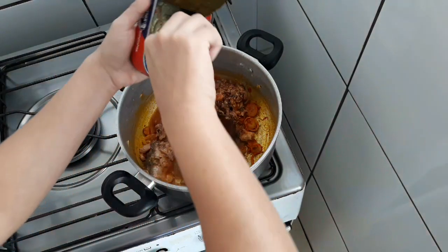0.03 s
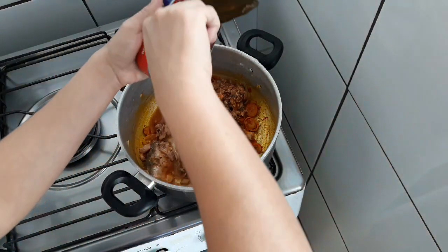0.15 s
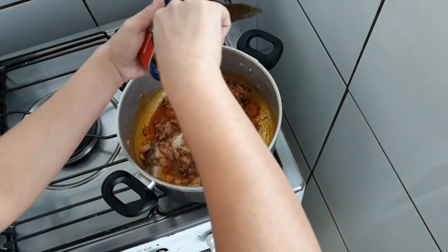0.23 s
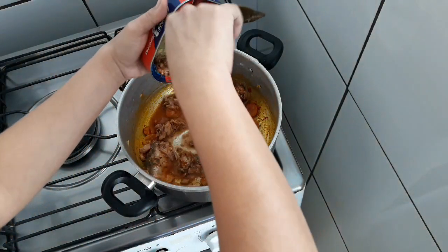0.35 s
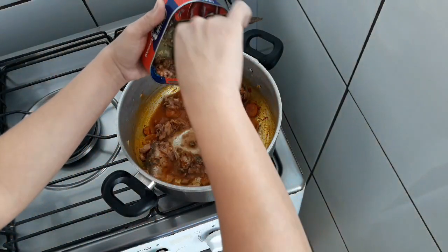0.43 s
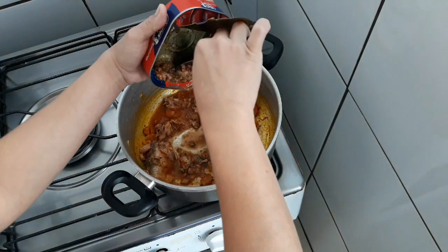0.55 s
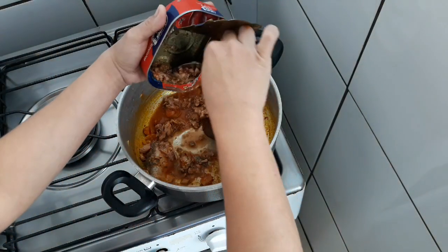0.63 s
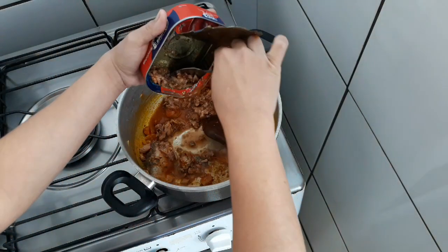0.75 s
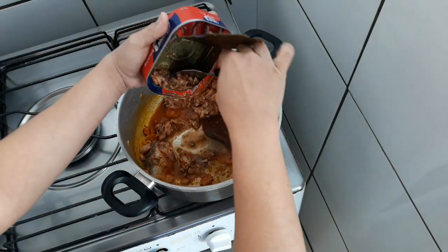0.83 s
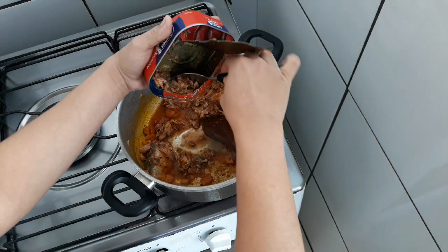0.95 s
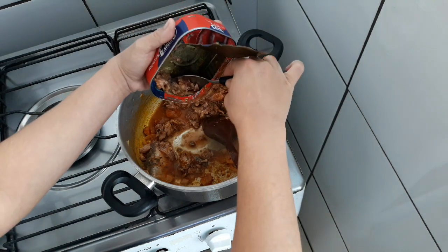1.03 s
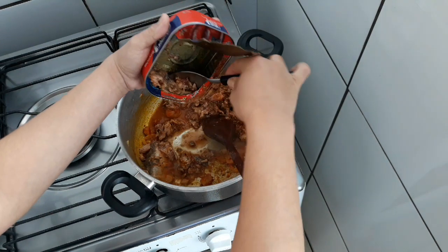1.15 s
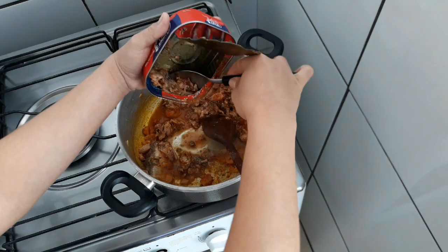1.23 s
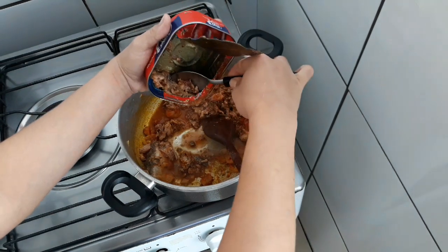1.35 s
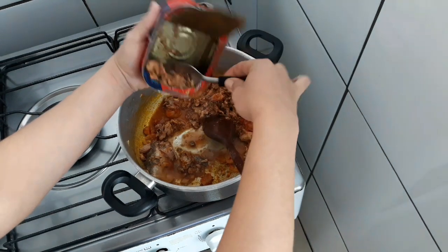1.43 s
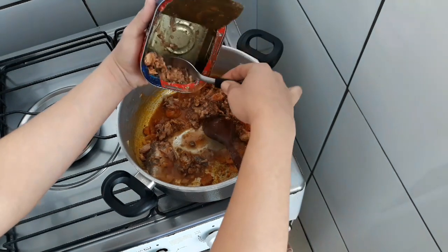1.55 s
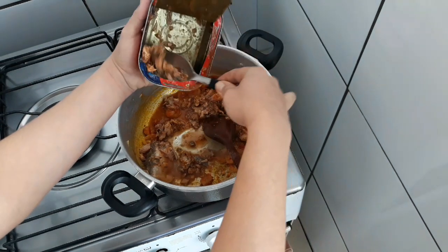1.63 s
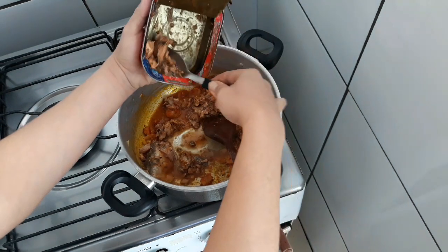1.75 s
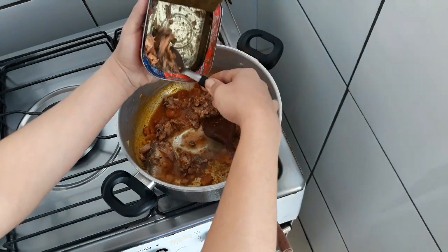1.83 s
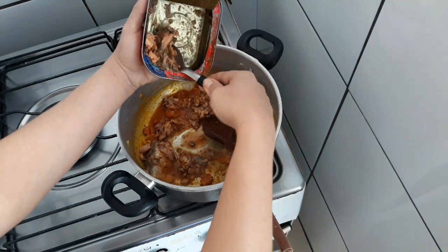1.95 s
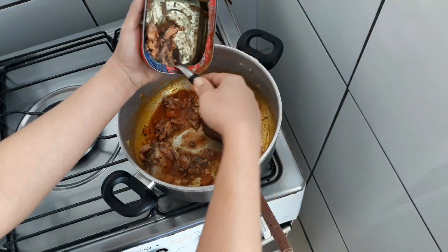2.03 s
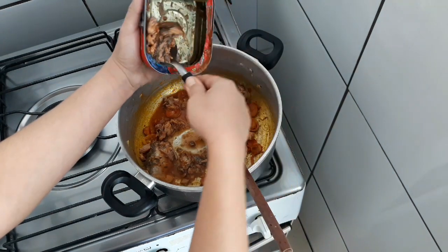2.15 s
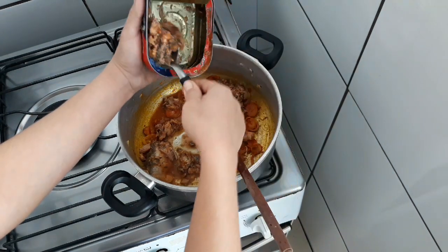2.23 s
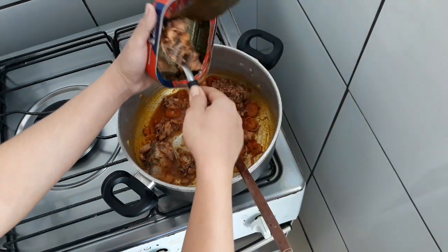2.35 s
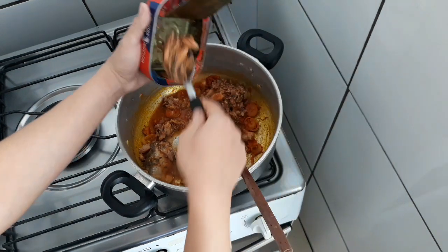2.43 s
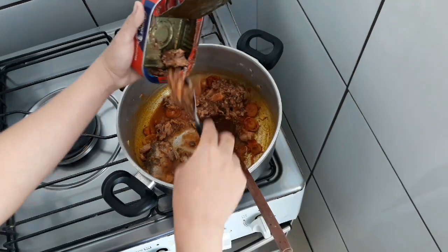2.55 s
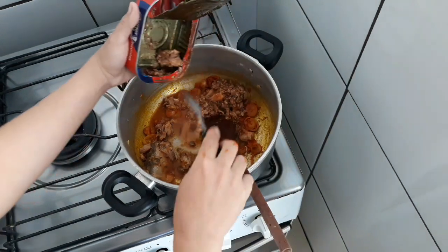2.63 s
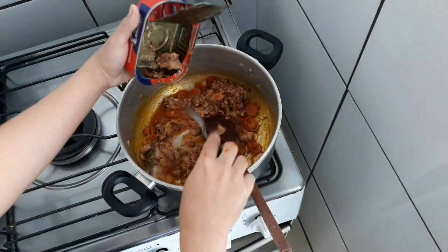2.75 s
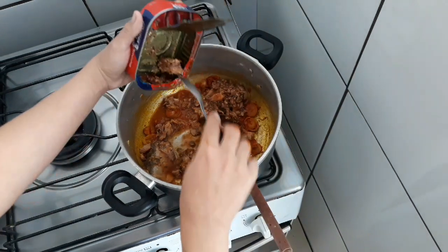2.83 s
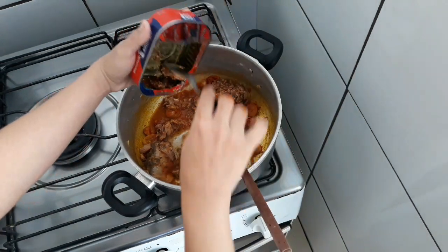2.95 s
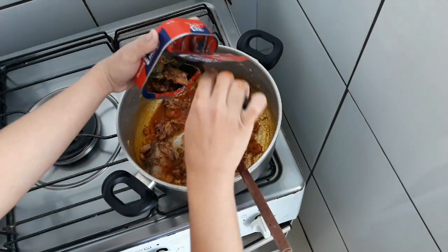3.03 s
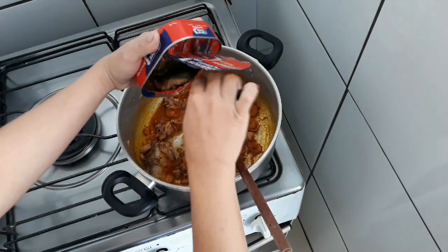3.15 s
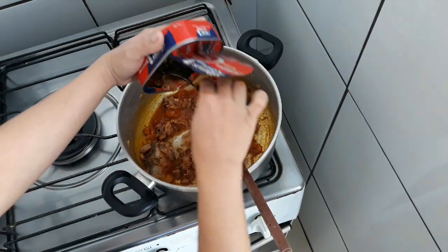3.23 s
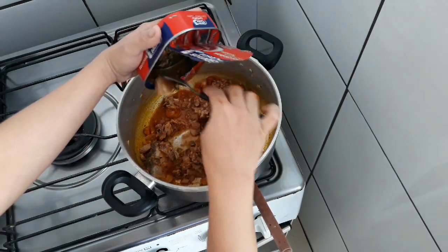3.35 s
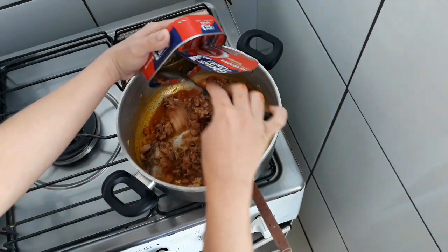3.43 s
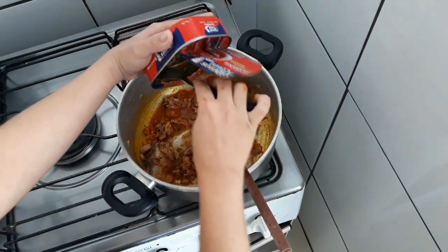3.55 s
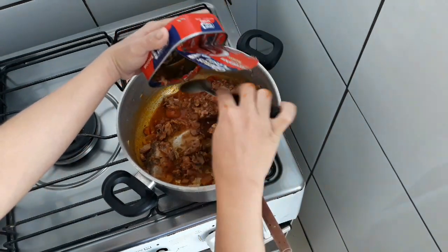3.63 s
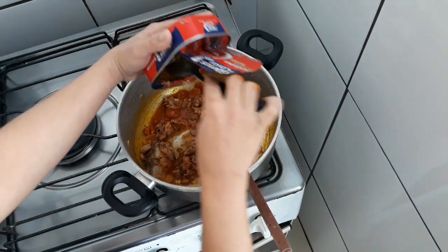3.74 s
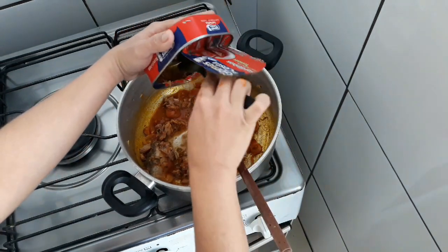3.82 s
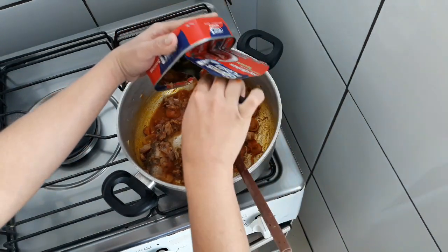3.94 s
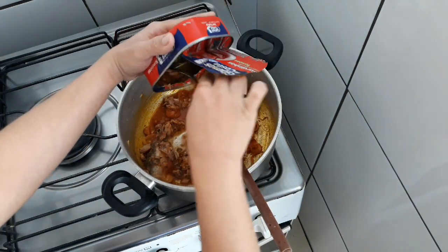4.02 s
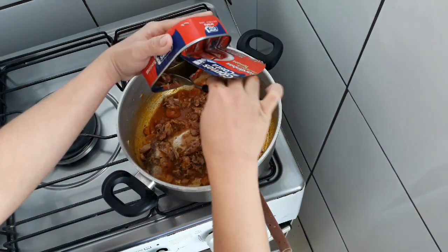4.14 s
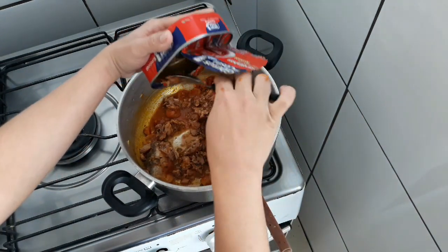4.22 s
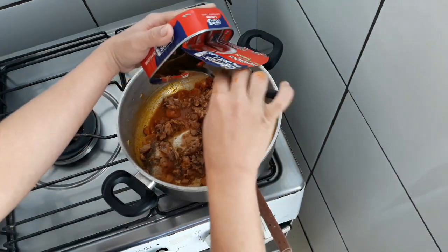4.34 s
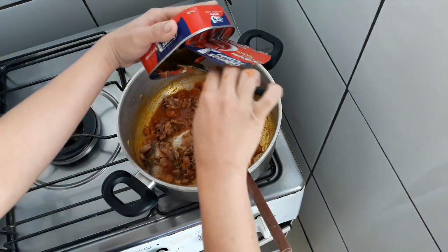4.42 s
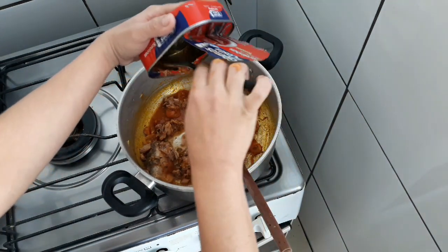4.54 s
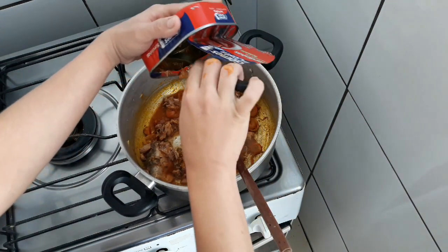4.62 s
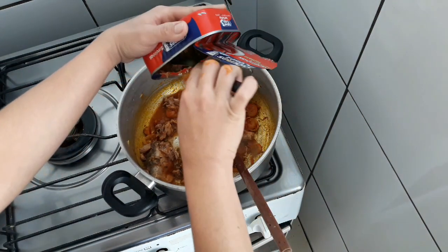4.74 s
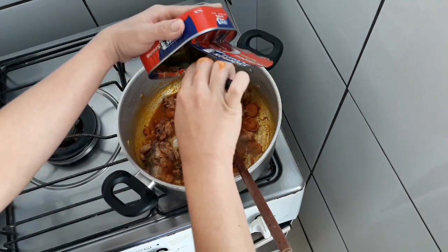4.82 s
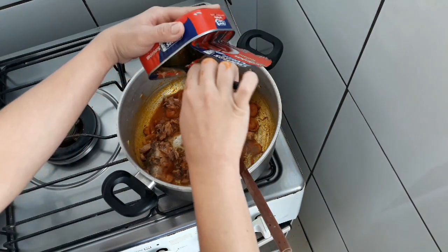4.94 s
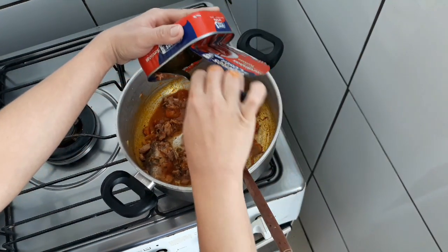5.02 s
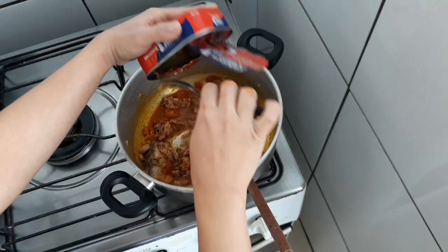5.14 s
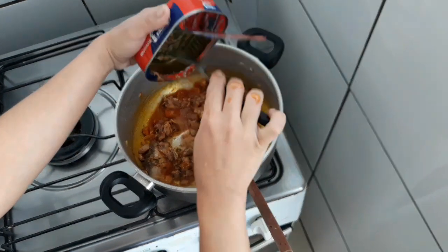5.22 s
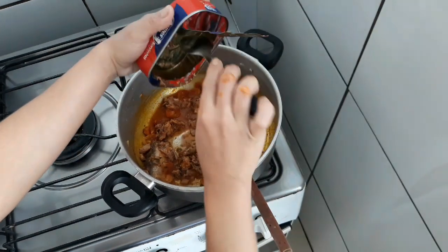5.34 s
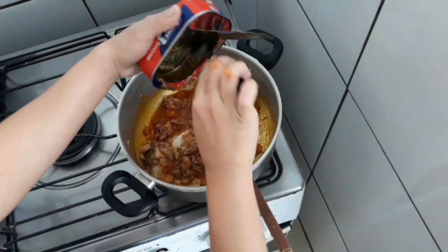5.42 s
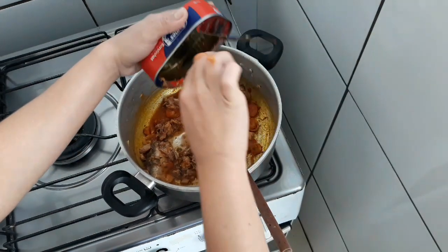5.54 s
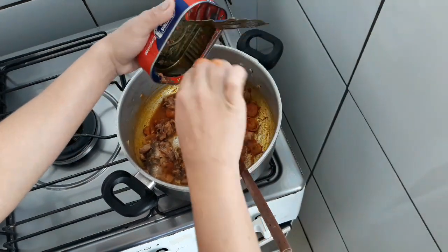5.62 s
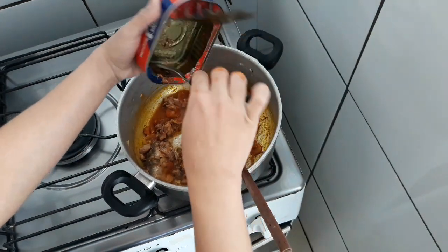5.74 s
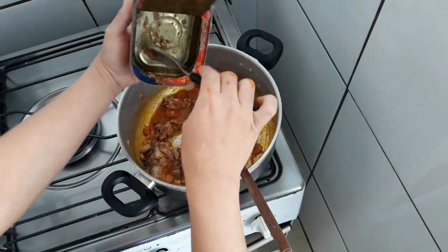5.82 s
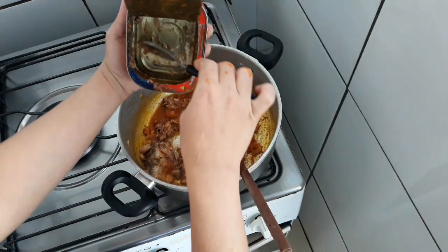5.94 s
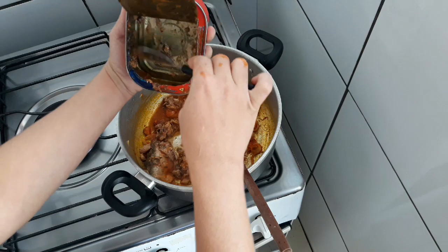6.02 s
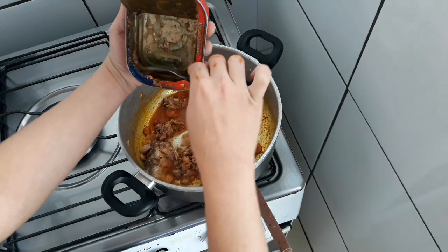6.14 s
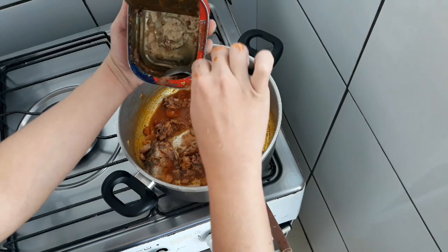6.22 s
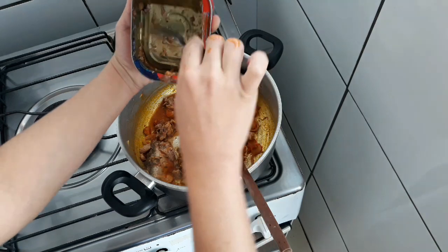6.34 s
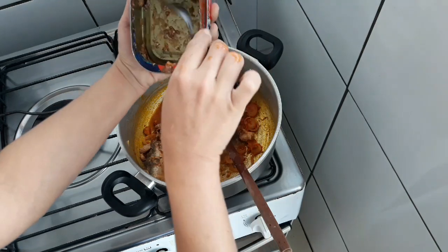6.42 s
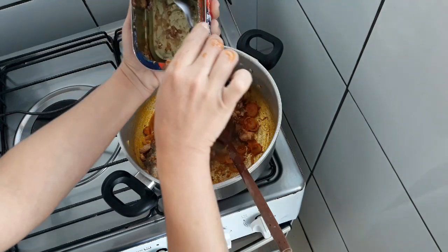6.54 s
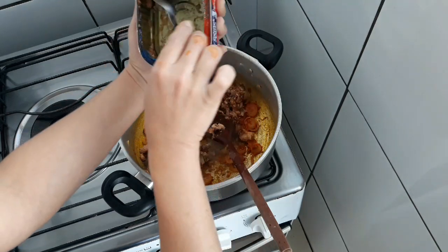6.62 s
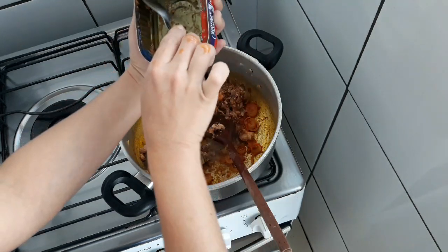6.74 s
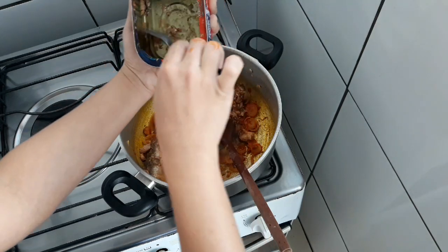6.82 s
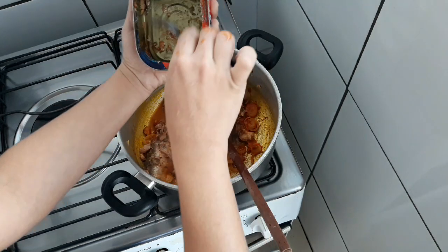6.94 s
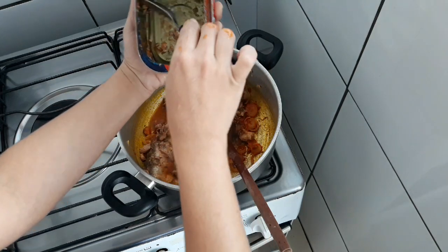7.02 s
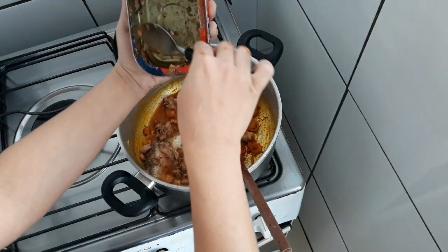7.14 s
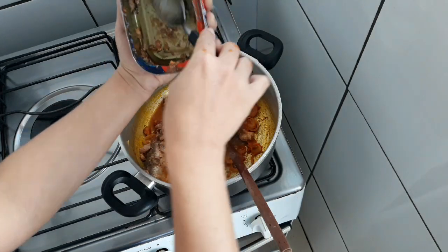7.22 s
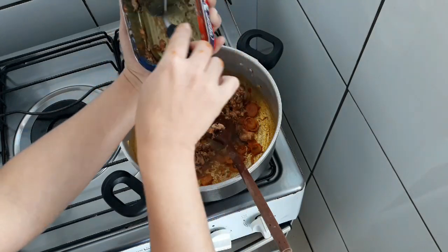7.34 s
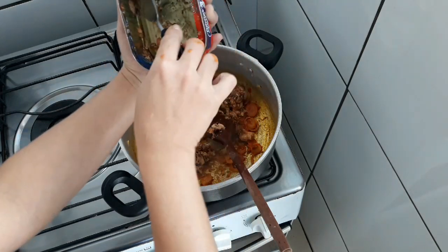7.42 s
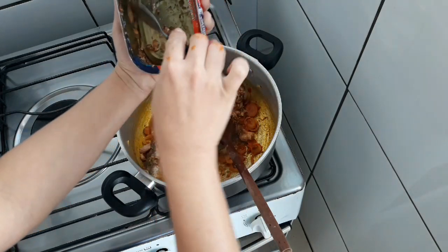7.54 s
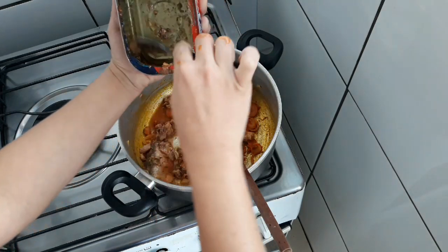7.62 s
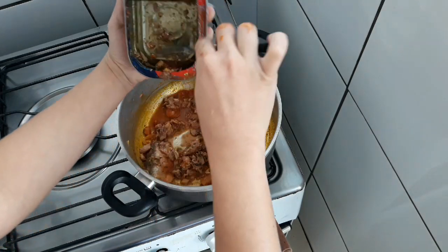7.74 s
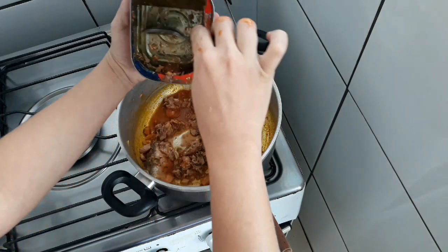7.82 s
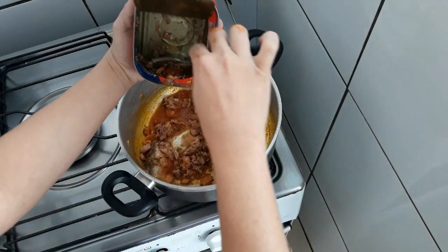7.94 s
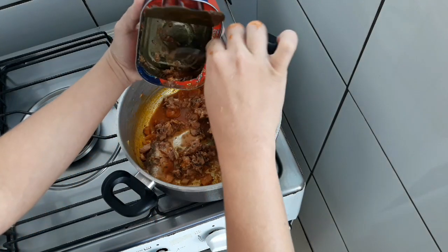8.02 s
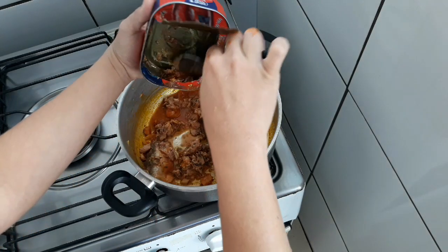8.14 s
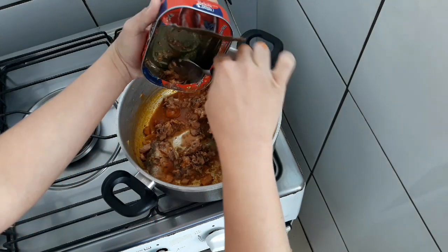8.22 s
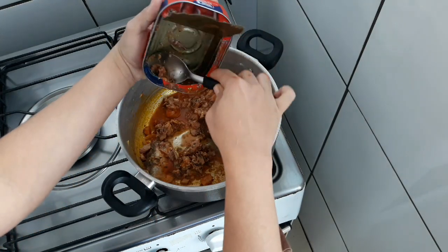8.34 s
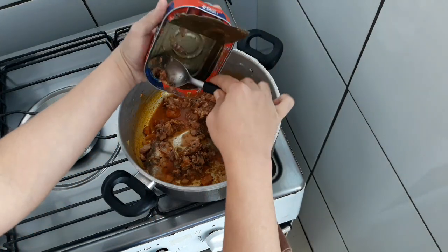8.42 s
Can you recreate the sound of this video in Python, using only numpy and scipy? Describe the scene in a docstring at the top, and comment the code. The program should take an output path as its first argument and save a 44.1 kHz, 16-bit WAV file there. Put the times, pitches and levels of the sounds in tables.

```python
"""A steel spoon knocks and scrapes in an open, hand-held fish tin above a pot in a small tiled kitchen.
From the start, over faint sizzle and room hum, impact and friction excite the tin's damped modes: flat
base, hollow box tone near 1.2 kHz and walls; the tiles reverberate. Bits of fish plop into the sauce
at 1.1 s and twice near 2.75 s. From 3 s the knocks crowd together, with a hard one at 4.7 s; the sizzle
then sinks a little. The hardest knock falls at 7.1 s, and the scraping goes on to the end."""
import sys
import numpy as np
from scipy import signal
from scipy.fft import rfft, irfft
from scipy.io import wavfile

SR = 44100
rng = np.random.default_rng(int(sys.argv[2]) if len(sys.argv) > 2 else 0)


def unload_audio(sound):
    """Save the sound as a 16-bit wav file, at the path given as the first command line argument."""
    columns = np.transpose(np.atleast_2d(sound))
    # keep every value between -1 and 1, then stretch to whole-number steps
    steps = np.round(np.clip(columns, -1, 1) * 32767)
    wavfile.write(sys.argv[1], SR, steps.astype(np.int16))


N = 373968

# Spoon impacts; the tin's levels here and below are relative, each part adding its own offset:
# (time [s], tick [dB], box [dB], base [dB], wall [dB], low clink [Hz], high clink [Hz], slide rasp [dB])
KNOCKS = [(0.2316, -19, -29.5, -28.5, -44, 2620, 8630, -28),
          (0.2535, -31, -35, -28, -37, 2450, 8700, -44.5),
          (0.4313, -45, -30, -44.5, -44, 2120, 4760, -33.5),
          (1.473, -7.5, -23.5, -33.5, -21, 2500, 4580, -25),
          (1.5072, -47, -14.5, -30, -27, 1500, 3970, -23.5),
          (1.704, -17.5, -24, -38, -26.5, 2610, 4230, -29.5),
          (1.7948, -36, -40, -41.5, -28.5, 2540, 4000, -29),
          (1.9754, -4.5, -28, -46, -18.5, 2630, 3880, -45), (2.029, -9, -16, -54, -10.5, 3100, 4660, -24),
          (2.1687, -24, -34.5, -44, -32.5, 2400, 4300, -49),
          (2.1854, -15, -32.5, -45, -24.5, 1810, 4470, -32),
          (2.3986, -15.5, -18.5, -32, -32, 2440, 4700, -31),
          (3.1119, -11, -20, -23.5, -19, 2124, 3620, -24),
          (3.1479, -26, -20.5, -26.5, -19, 2100, 4500, -33.5),
          (3.1914, -14.5, -27, -46, -27, 3130, 4600, -19.5),
          (3.2313, -5, -25, -18.5, -17, 2060, 5000, -17.5), (3.2575, -23, -7, -27, -26, 1590, 3750, -22),
          (3.376, -18, -24, -39, -30.5, 1560, 3930, -34), (3.4267, -22, -24.5, -48, -32, 3180, 4020, -33.5),
          (3.5309, -15, -17, -24, -38, 1500, 7700, -31.5), (3.6118, -12, -5.5, -21, -12, 1500, 4210, -14),
          (3.6658, -10.5, -38, -58, -24, 3200, 4180, -41),
          (3.8437, -7.5, -13, -26.5, -12, 2080, 4080, -26.5),
          (3.9102, -21, -14, -27, -22, 2260, 3960, -35.5),
          (4.0038, -10.5, -29, -43, -29, 2110, 4300, -27.5), (4.0473, -8, -19, -34, -25, 2470, 4100, -24),
          (4.1285, -13, -33, -38, -26, 2570, 4050, -21), (4.172, -20, -29, -34, -34, 3260, 5000, -32.5),
          (4.286, -19, -28.5, -43, -29.5, 2130, 3570, -35.5),
          (4.4307, -17, -22.5, -38.5, -27, 2270, 4800, -44.5),
          (4.6034, -15.5, -30.5, -71, -31, 2490, 3970, -28.5),
          (4.665, -29, -22.5, -53, -37, 2700, 3990, -48), (4.7464, -3, -1, -29, -7, 2085, 3860, -16),
          (4.9554, -18.5, -22.5, -33.5, -27, 2750, 4940, -25.5),
          (5.1351, -24, -32.5, -43.5, -27, 2330, 4100, -36),
          (5.471, -15.5, -28, -30.5, -26.5, 2060, 4060, -28),
          (5.5106, -6.5, -9.5, -28.5, -12, 2690, 3960, -19.5),
          (5.6145, -17.5, -18, -36, -24.5, 2650, 4440, -22.5),
          (5.6495, -16, -39, -33, -28, 1550, 9160, -31), (5.681, -12.5, -19.5, -42, -34, 2110, 3450, -36),
          (6.0579, -34, -28, -42, -36, 2290, 4440, -47), (6.0721, -39, -23.5, -34, -27.5, 1986, 3847, -33),
          (6.259, -20, -35.5, -40.5, -30, 1670, 3550, -31), (6.3844, -21.5, -33, -37, -18, 1910, 3924, -42),
          (6.545, -12, -12, -38, -20, 3350, 4570, -26), (6.648, -46, -30, -40, -42, 2790, 3590, -30.5),
          (6.7253, -11, -10, -28, -17.5, 1594, 4450, -23.5), (6.924, -32, -37, -54, -28, 2120, 4420, -27),
          (7.0934, -1.5, -1.5, -14.5, -4.5, 2943, 3590, -10.5),
          (7.4223, -13, -6.5, -32.5, -22.5, 1936, 3750, -32),
          (7.435, -17, -13.5, -28, -15, 1883, 3830, -28), (7.617, -34.5, -49, -43, -35, 2010, 4650, -44),
          (7.634, -23, -28, -36, -29, 1820, 4570, -32), (7.7445, -20, -18, -48, -24, 1750, 4770, -36),
          (7.86, -31, -32, -37.5, -27, 2094, 4070, -39), (7.8993, -44, -29, -39.5, -46, 2240, 3500, -43),
          (7.955, -16.5, -31, -34, -25.5, 3540, 3650, -31),
          (7.9889, -19, -22.5, -35, -32, 1870, 3900, -44.5),
          (8.1269, -16, -22.5, -34.5, -18, 2053, 3970, -28),
          (8.2242, -13, -16.5, -23.5, -25.5, 2330, 4160, -30),
          (8.3232, -15, -17.5, -33, -19, 2143, 4510, -25), (8.379, -15, -27, -36, -22, 2410, 4470, -46),
          (8.4185, -11.5, -17, -50, -27, 2420, 3970, -33.5)]
# Strokes along the ribs, plus quiet long slides of food in the tin at 1.3 s and 2.72 s: # (time of full
# pressure [s], swell [s], hold [s], box [dB], base [dB], rasp [dB], rasp centre [Hz])
STROKES = [(0.0, .01, 0.031, -15.5, -30.5, -28.5, 2830), (0.277, 0.12, 0.0042, -17.5, -27.5, -21, 2680),
           (1.186, 0.059, .04, -27.5, -40, -43, 3920), (1.3, .1, 0.3, -65, -48, -61, 5000),
           (1.459, 0.034, 0.036, -23.5, -29, -28, 2900), (1.702, 0.048, .01, -29, -39, -35, 3000),
           (2.4, .015, 0.019, -22, -33, -37, 2500), (2.72, .05, 0.33, -73, -47.5, -53, 5070),
           (3.251, .05, 0.11, -29, -29, -27, 3000), (3.533, 0.033, 0.051, -18.5, -33, -34.5, 4000),
           (3.678, 0.1, 0.018, -23, -30.5, -27, 3050), (3.991, 0.17, 0.024, -19.5, -32, -26, 4950),
           (4.762, .01, 0.009, -8, -45, -27, 2300), (4.987, .03, 0.018, -38, -34.5, -35.5, 2700),
           (5.66, .03, 0.028, -36, -30, -39, 3000), (5.725, 0.13, 0.0056, -12, -31, -19.5, 3320),
           (6.125, 0.087, 0.088, -32, -45.5, -42, 3450), (6.711, 0.033, .01, -13.5, -45, -30, 2480),
           (6.93, 0.26, 0.0081, -36, -32.5, -28.5, 3140), (7.11, .015, 0.065, -23, -26.5, -27, 2950),
           (7.705, 0.17, 0.03, -23.5, -26, -28, 2450), (7.995, 0.38, 0.0073, -26.5, -40, -31.5, 3620),
           (8.224, 0.11, 0.016, -13, -26.5, -20.5, 2500), (8.384, 0.23, 0.012, -20, -26.5, -23, 2550)]
# Steady rubbing of the spoon lying in the tin: (box [dB], base [dB], rasp [dB], rasp centre [Hz])
RESTING_RUB = (-48, -57, -49.5, 5003)
# Normal modes of base, box tone and walls: (frequency [Hz], width before damping factor [Hz], gain [dB])
BASE_MODES = [(250, 65, -5), (309, 34.4, -1), (360.5, 66, 3), (380, 43, -11), (575, 59, -7), (736, 46, -4),
              (936.5, 24, -11.5)]
BOX_MODES = [(1120, 39, -10), (1152, 31, -2), (1196.4, 24, -4), (1251, 49, -1), (1252.4, 83, 2),
             (1338, 40, -10), (1380, 28, -16.5)]
WALL_MODES = [(1500, 13.7, -3.5), (1592, 48, 3), (1771, 72, -10.5), (1927, 170, 5), (1976, 20.4, 0.5),
              (2164, 21.3, -2), (2450, 39, 2), (2568, 15, -6), (2677, 39, 2.5), (3095, 180, 4),
              (3024, 85, 4), (3266, 23, 0.5), (3954, 13, -1.5), (4470, 140, 4.5), (4760, 44, -16),
              (5590, 110, 4.5)]
# Spectra of steel-on-steel ticks and friction grains: (frequency [Hz], relative density [dB])
TICK_SPECTRUM = [(290, -49), (500, -18.5), (1680, -7.5), (3550, -18), (4410, -5), (5800, -15), (8090, -7.5),
                 (9080, -13.5), (15700, -29.5)]
RASP_SPECTRUM = [(880, -32), (1500, -7), (2670, -8), (2920, -13.5), (4890, -8.5), (5560, -14.5),
                 (8620, -10), (10100, -22), (15500, -19)]
# Fish landing in the sauce: (time [s], plop [dB], starting pitch [Hz], splash [dB])
PLOPS = [(1.132, -40.5, 560, -52), (2.707, -28.5, 456, -22), (2.79, -32.5, 397, -26.5)]
# Reverberation of the tiled room: (frequency [Hz], time to fall 60 dB [s])
REVERB_TIMES = [(100, 0.84), (260, 0.23), (700, 0.47), (1840, 0.26), (4850, 0.26), (12800, 0.082)]
# Course of the sizzle: (time [s], level [dB])
SIZZLE_LEVELS = [(0, -47.5), (3, -46.5), (4.5, -45.5), (5.3, -50.5), (8.48, -51)]
# Spectra of the sauce's sizzle and the room's hum: (frequency [Hz], relative density [dB])
SIZZLE_SPECTRUM = [(1200, -38.5), (1700, -17), (3000, -8), (4600, -5), (4950, -2), (5100, 5), (5300, -4.5),
                   (6000, -3.5), (7700, -1), (8900, 1.5), (9700, -9.5), (11000, -8), (14000, -8),
                   (15700, -10)]
HUM_SPECTRUM = [(15, -28), (30, -9), (46, -3.5), (69, -7), (102, -2), (136, -7), (221, -8.5), (257, -12),
                (278, -1.5), (417, -23.5), (525, -7.5), (662, -15.5), (866, -13.5), (2500, -70),
                (3250, -76), (5500, -120)]

TIN_LOWEST_HZ = 235   # a tin this small radiates no bass
HOLLOW_HZ = (1054, 1454)   # band that the air in the open tin passes on
FLEX_HZ = (251, 434)   # rubbing flexes the base slowly, driving mainly its lowest modes
SKID_S, SOFT_SKID_SHARE = 0.0015, 0.23   # skid decay for a -8.5 dB tick; dB longer per dB softer
SLIDE_BOX_DB, SLIDE_BASE_DB = 5.5, -7   # relative to the slide's rasp
SLIDE_LEAN = 0.34   # share of the knock's balance that its slide inherits
SLIDE_ATTACK_S, SLIDE_FADE_DB_PER_S = 0.0056, 184
SWELL_DB, STROKE_FADE_DB_PER_S = 30.5, 264.5
ROOM_DB, FIRST_ECHO_S, HUM_DB = -6, 0.00066, -56


def tin():
    """Superposition: base, box and walls respond to impact and friction together, with rasp and clinks."""
    knock_box_db, knock_base_db, knock_wall_db = np.transpose(KNOCKS)[2:5]
    rub_box_db, rub_base_db, rasp_db, centre_hz = friction()
    rub, bursts = grains(500, spread_db=2.0), impacts()
    push = grains(4000, spread_db=0.5)
    flex = butterworth(push, FLEX_HZ) + 0.24 * push
    base = tin_modes(BASE_MODES, knock_base_db - 0.5, bursts, from_db(rub_base_db - 36.5) * flex,
                     damping=0.95, spot_db=2.0)
    box = tin_modes(BOX_MODES, knock_box_db - 3.5, bursts, from_db(rub_box_db - 40.5) * rub,
                    damping=1.1, spot_db=3.0)
    box = butterworth(box, HOLLOW_HZ)   # the tone swells in a few ms
    walls = tin_modes(WALL_MODES, knock_wall_db - 1.5, bursts, from_db(rasp_db - 52.0) * rub,
                      damping=1.7, spot_db=2.0, focus_db=11.5)
    whole = base + box + walls + rasp(rasp_db, centre_hz) + clinks_and_ticks(bursts)
    return butterworth(whole, TIN_LOWEST_HZ, "high", order=6)


def tin_modes(modes, knock_db, bursts, rubbing, damping, spot_db, focus_db=0):
    """Modal synthesis: each mode is a driven resonator, and each struck spot favours different modes."""
    onset_s, clink_hz = np.transpose(KNOCKS)[[0, 5]]
    samples = (onset_s[:, None] * SR).astype(int) + np.arange(bursts.shape[1])
    spots, out = rng.normal(0, 1, (len(KNOCKS), len(modes))), np.zeros(N)
    for k, (hz, width_hz, db) in enumerate(modes):
        off_pitch = 1 - np.exp(-(np.log2(hz / clink_hz) / 0.064) ** 2)
        polarity = np.sign(spots[:, k - 1])
        strength = from_db(knock_db + spot_db * spots[:, k] - focus_db * off_pitch)
        strength = polarity * strength / drive_at(bursts, hz)
        knocking = np.bincount(samples.ravel(), (strength[:, None] * bursts).ravel(), N)
        out += from_db(db) * ring(rubbing + knocking, hz, damping * width_hz)   # hand and food damp it
    return out


def impacts():
    """Contact force: each knock skids in a unit-energy burst of micro-contacts, longer when softer."""
    t = np.arange(1024) / SR
    tick_db = np.array(KNOCKS)[:, 1:2]
    skid_s = SKID_S * from_db(-SOFT_SKID_SHARE * (tick_db + 8.5))
    bursts = rng.standard_normal((len(KNOCKS), len(t))) ** 3 * np.exp(-t / skid_s)
    return bursts / np.sqrt(np.sum(bursts ** 2, axis=1, keepdims=True))


def drive_at(bursts, hz):
    """Fourier magnitude: how strongly each burst drives one frequency, floored for safe division."""
    phasor = np.exp(-2j * np.pi * hz * np.arange(bursts.shape[1]) / SR)
    return np.maximum(np.abs(bursts @ phasor), 0.25)


def clinks_and_ticks(bursts):
    """Impact transients: two short partials of the struck spot and a few ms of bright rattle."""
    length = 2048
    t = np.arange(length) / SR
    clinks, ticks = np.zeros((2, N + length))
    rattles = rng.standard_normal((len(KNOCKS), length))
    for (s, tick_db, _, _, wall_db, low_hz, high_hz, _), burst, rattle in zip(KNOCKS, bursts, rattles):
        span = slice(int(s * SR), int(s * SR) + length)
        high = np.convolve(damped_sine(high_hz, t, decay_s=0.0027), burst)[:length]
        clinks[span] += from_db(wall_db - 4.0) * high / drive_at(burst[None], high_hz)
        clinks[span] += from_db(wall_db - 9.5) * damped_sine(low_hz, t, decay_s=0.0079)
        delivered_energy = np.cumsum(np.pad(burst, (0, length - len(burst))) ** 2)
        ticks[span] += from_db(tick_db - 10.5) * rattle * np.exp(-t / 0.0062) * delivered_energy
    return clinks[:N] + colour(ticks[:N], TICK_SPECTRUM)


def friction():
    """Incoherent rubbing adds in power; gives box, base and rasp levels [dB] and rasp centre [Hz]."""
    onset_s, _, box_db, base_db, wall_db, low_hz, _, slide_db = np.transpose(KNOCKS)
    slides = np.transpose([slide_db + SLIDE_BOX_DB + SLIDE_LEAN * (box_db - wall_db),
                           slide_db + SLIDE_BASE_DB + SLIDE_LEAN * (base_db - wall_db), slide_db, low_hz])
    t = np.arange(N // 32 + 2) * 32 / SR
    age_s = t - onset_s[:, None]
    slide_shape = np.clip(age_s / SLIDE_ATTACK_S, 0, 1) * from_db(-SLIDE_FADE_DB_PER_S * np.abs(age_s))
    top_s, swell_s, hold_s = np.transpose(STROKES)[:3, :, None]
    rise_db = -SWELL_DB * np.maximum(top_s - t, 0) / (swell_s + 1e-3)
    fade_db = -STROKE_FADE_DB_PER_S * np.maximum(t - top_s - hold_s, 0)
    rubs = np.vstack([slides, np.array(STROKES)[:, 3:], RESTING_RUB])
    activity = np.vstack([slide_shape, from_db(rise_db + fade_db), np.ones_like(t)]).T ** 2
    peak_power = from_db(rubs[:, :3]) ** 2
    power = (activity @ peak_power).T
    centre_hz = activity @ (peak_power[:, 2] * rubs[:, 3]) / power[2]   # mean weighted by rasp power
    return in_time(np.transpose([t, *(10 * np.log10(power)), centre_hz]))


def rasp(rasp_db, centre_hz):
    """Friction noise: each gritty catch rings a few cycles, strongest near the scraped spot's pitch."""
    grit = grains(4500, spread_db=3.8)
    grain_band, out = rng.integers(0, 24, N), 0
    for band, hz in enumerate(np.geomspace(1600, 14000, 24)):
        nearness_db = 6.8 * np.exp(-(np.log2(hz / centre_hz) / 0.74) ** 2)
        gain = from_db(at_hz(RASP_SPECTRUM, hz) + nearness_db + 5.0 * drift(16))
        force = gain * grit * (grain_band == band)
        out += ring(force, hz, width_hz=0.07 * hz) * hz / 1000   # equal level per Hz
    return from_db(rasp_db - 7.5) * unit_rms(out)


def plops():
    """Bubble resonance: an air pocket rings with rising pitch, amid dull slosh and a short splash."""
    out, t = np.zeros(N), np.arange(8192) / SR
    noises = rng.standard_normal((len(PLOPS), 2, len(t)))
    for (s, plop_db, hz, splash_db), (low, high) in zip(PLOPS, noises):
        pocket = damped_sine(hz * (1 + 12.0 * t), t, decay_s=0.0043)
        slosh = 1.55 * butterworth(low * np.exp(-t / 0.023), (250, 750))
        splash = butterworth(high * np.exp(-t / 0.0037), (2000, 9500))
        start = int(s * SR)
        out[start:start + len(t)] += from_db(plop_db) * (pocket + slosh) + from_db(splash_db) * splash
    return out


def kitchen(x):
    """Diffuse reverberation: dense echoes from the tiles, each octave decaying at its own rate."""
    t, tail = np.arange(SR // 2) / SR, 0
    for low_hz in 60 * 2 ** np.arange(8):
        decay = from_db(-60 * t / at_hz(REVERB_TIMES, low_hz * np.sqrt(2)))
        tail += butterworth(rng.standard_normal(len(t)), (low_hz, 2 * low_hz)) * decay
    tail *= np.clip(t / FIRST_ECHO_S - 1, 0, 1)
    return signal.oaconvolve(x, tail / np.sqrt(np.sum(tail ** 2)))[:N]


def sizzle():
    """Shot noise: the sauce's fine, dense clicks merge with an even hiss."""
    fizz = rng.standard_normal(N) + 0.77 * grains(3200, spread_db=-12.0)
    level_db = in_time(SIZZLE_LEVELS)[0] + 0.4 * drift(6)
    return from_db(level_db) * unit_rms(colour(fizz, SIZZLE_SPECTRUM))


def hum():
    """Amplitude-modulated noise: the low, slowly wavering background of the room."""
    return from_db(HUM_DB + 0.93 * drift(1)) * unit_rms(colour(rng.standard_normal(N), HUM_SPECTRUM))


def ring(force, hz, width_hz):
    """Damped resonator: a unit impulse starts a decaying sine of height about 1."""
    radius, angle = np.exp(-np.pi * width_hz / SR), 2 * np.pi * hz / SR
    return signal.lfilter([0, np.sin(angle)], [1, -2 * radius * np.cos(angle), radius ** 2], force + 1e-18)


def damped_sine(hz, t, decay_s):
    """Free vibration with exponential decay."""
    return np.sin(2 * np.pi * hz * t) * np.exp(-t / decay_s)


def grains(per_s, spread_db):
    """Poisson process with a drifting rate: clumps of uneven clicks, rms 1."""
    sizes = from_db(spread_db * np.minimum(rng.exponential(1, N), 4)) * rng.choice([-1, 1], N)
    occurs = rng.random(N) < per_s * from_db(4.0 * drift(35)) / SR
    return unit_rms(sizes * occurs)


def drift(rate_hz):
    """Low-pass noise: a slow random fluctuation, rms 1."""
    hop, settle = 40, 2000
    pole = np.exp(-2 * np.pi * rate_hz * hop / SR)
    noise = rng.standard_normal(N // hop + settle + 2)
    slow = signal.lfilter([1], [1, -2 * pole, pole ** 2], noise)[settle:]
    return np.interp(np.arange(N) / hop, np.arange(len(slow)), unit_rms(slow))


def colour(x, spectrum):
    """Minimum-phase filter with the given spectrum and unit power gain."""
    log_gain = np.log(from_db(at_hz(spectrum, np.fft.rfftfreq(4096, 1 / SR))))
    cepstrum = irfft(log_gain)
    cepstrum[1:2048] *= 2   # folding onto positive time makes the filter causal
    cepstrum[2049:] = 0
    taps = irfft(np.exp(rfft(cepstrum)))
    return signal.oaconvolve(x, taps / np.sqrt(np.sum(taps ** 2)))[:len(x)]


def butterworth(x, hz, kind="band", order=2):
    """Filter with a maximally flat passband."""
    return signal.sosfilt(signal.butter(order, hz, kind, fs=SR, output="sos"), x)


def in_time(rows):
    """Linear interpolation of a table's columns over time, one value per sample."""
    times, *columns = np.transpose(rows)
    return [np.interp(np.arange(N) / SR, times, column) for column in columns]


def at_hz(points, hz):
    """Interpolation of a table on a log-frequency axis."""
    frequencies, values = np.transpose(points)
    return np.interp(np.log(np.maximum(hz, 1)), np.log(frequencies), values)


def from_db(db):
    """Decibels to amplitude ratio."""
    return 10 ** (np.asarray(db) / 20)


def unit_rms(x):
    """Normalisation to unit power."""
    return x / np.sqrt(np.mean(x ** 2) + 1e-20)


def scene():
    """Direct and reverberant sound of tin and plops add to the sizzle and hum."""
    direct = tin() + plops()
    return (direct + from_db(ROOM_DB) * kitchen(direct) + sizzle() + hum())[None]


def record(dry):
    """Soft saturation rounds the highest peaks; a steep low-pass stops the treble above 16.1 kHz."""
    rounded = 1.05 * np.tanh(dry / 1.05)
    return signal.sosfilt(signal.cheby2(24, 70, 16100, fs=SR, output="sos"), rounded)


dry = scene()
out = record(dry)
unload_audio(out)
```